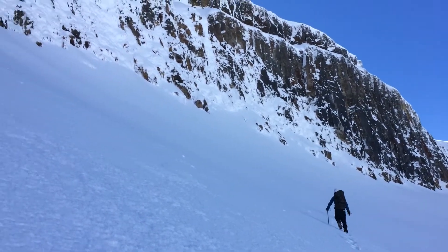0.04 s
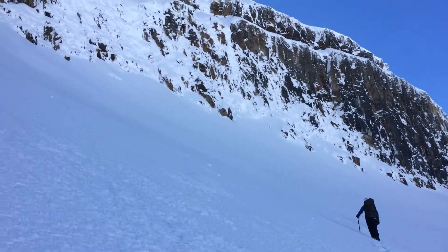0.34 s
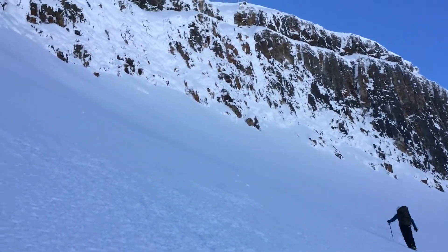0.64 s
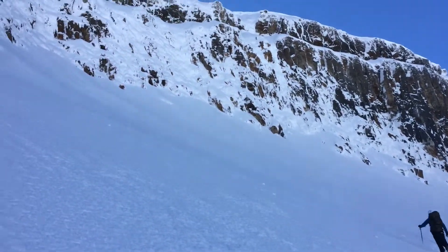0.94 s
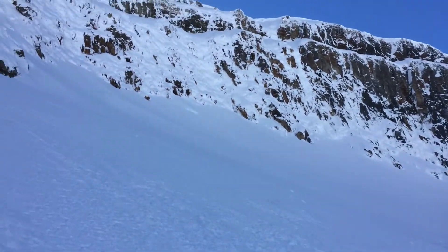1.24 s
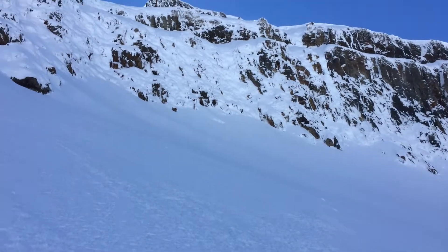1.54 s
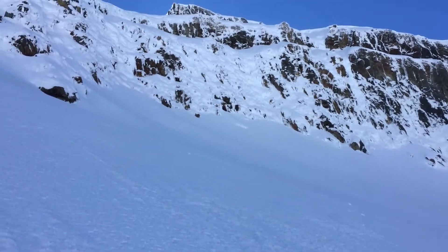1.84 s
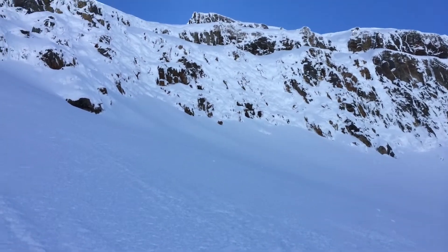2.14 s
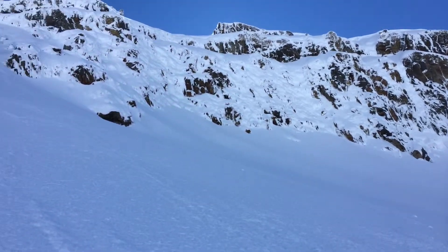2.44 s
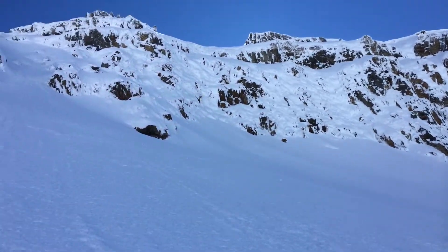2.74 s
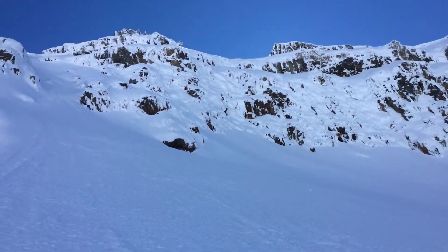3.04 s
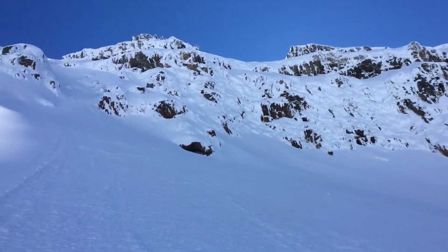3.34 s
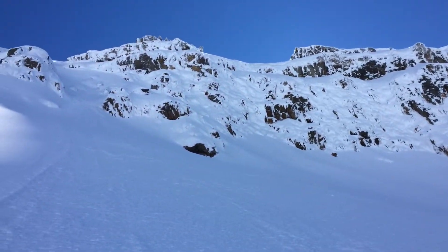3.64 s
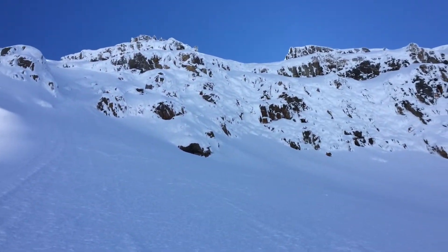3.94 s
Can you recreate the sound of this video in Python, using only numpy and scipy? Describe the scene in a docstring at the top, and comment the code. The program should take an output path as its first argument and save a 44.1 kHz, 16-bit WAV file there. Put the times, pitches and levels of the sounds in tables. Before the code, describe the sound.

A constant, static-like hiss of sliding snow grains, with tiny ticks on a mountainside.

```python
"""A bright, steady hiss: fine snow grains slide down a mountain slope in countless tiny impacts.
Far grains merge into a wash, nearer ones tick, larger icy crumbs ping faintly.
Under it, light air rumbles at the microphone and a hand panning the camera makes a few soft bumps.
The sound is mono."""
import sys
import numpy as np
from scipy import signal
from scipy.fft import rfft, irfft
from scipy.io import wavfile
from scipy.ndimage import uniform_filter1d

SR = 44100
rng = np.random.default_rng(int(sys.argv[2]) if len(sys.argv) > 2 else 0)


def unload_wav(signal):
    """Save mono or channel-first audio to the path in sys.argv[1] as 16-bit WAV at rate SR, clipped to [-1, 1]."""
    wavfile.write(
        sys.argv[1],
        SR,
        np.round(np.clip(np.atleast_2d(signal).T, -1, 1) * 32767).astype(np.int16),
    )


N = 176400
BAND_LIMIT_HZ = 15300


def gain_of(db):
    """Decibels to gain."""
    return 10 ** (np.asarray(db) / 20)


def unit_rms(x):
    """x scaled to rms 1."""
    return x / np.sqrt(np.mean(x ** 2) + 1e-20)


def gain_curve(points):
    """Gain per sample from (time_s, level_db) rows, linear in dB."""
    return gain_of(np.interp(np.arange(N) / SR, *np.transpose(points)))


def coloured(x, spectrum):
    """x filtered by (freq_hz, level_db) rows, band-limited, at rms 1."""
    freq_hz, level_db = np.transpose(spectrum)
    bin_hz = np.fft.rfftfreq(N, 1 / SR)
    response = gain_of(np.interp(np.log(bin_hz + 1), np.log(freq_hz), level_db))
    in_band = bin_hz < BAND_LIMIT_HZ + 200
    return unit_rms(irfft(rfft(x) * response * in_band, N))


def highpass(x, edge_hz):
    """The part of x above a soft edge."""
    ratio = (np.fft.rfftfreq(N, 1 / SR) / edge_hz) ** 4
    return irfft(rfft(x) * ratio / (1 + ratio), N)


def patchy_noise(patch_s, patch_hz, patch_db, flicker_db, size=256):
    """White noise whose level drifts in time-frequency patches and flickers as a whole."""
    hop = size // 4
    spectra = signal.stft(rng.standard_normal(N), nperseg=size, noverlap=size - hop)[2].T
    frames = max(1, round(patch_s * SR / hop))
    bins = max(1, round(patch_hz * size / SR))
    drift = uniform_filter1d(rng.standard_normal(spectra.shape), frames, axis=0)
    patches = unit_rms(uniform_filter1d(drift, bins, axis=1))
    flicker = unit_rms(uniform_filter1d(rng.standard_normal(len(spectra)), max(1, frames // 2)))
    spectra *= gain_of(patch_db * patches + flicker_db * flicker[:, None])
    return signal.istft(spectra.T, nperseg=size, noverlap=size - hop)[1][:N]


def air_rumble():
    """Light air at the microphone: a faint, lumpy rumble."""
    # freq_hz, density_db
    spectrum = [(15, -38), (30, -14), (45, -5), (58, 0.5), (90, -2), (130, -0.5), (185, 2.5), (245, -4),
                (340, -2.5), (450, -9), (800, -28), (3000, -48)]
    # time_s, level_db
    levels = [(0, -71.5), (.8, -69), (1.3, -69), (1.85, -72), (2.25, -67.5), (2.65, -71.5), (2.87, -65.5),
              (3.07, -70.5), (3.4, -69.5), (4, -70)]
    noise = patchy_noise(patch_s=0.046, patch_hz=300, patch_db=1.8, flicker_db=0.8)
    return gain_curve(levels) * coloured(noise, spectrum)


def hand_bumps():
    """A hand pushes and pulls on the camera body: dull pulses of a few cycles at most."""
    # centre_s, envelope_peak_db, pitch_hz, half_width_s
    bumps = [(0.043, -62.5, 60, 0.023), (.425, -63, 85, 0.011), (1.246, -64, 160, .007),
             (1.313, -47, 244, 0.0015), (1.697, -61.5, 190, 0.0068), (2.86, -79, 100, 0.009),
             (3.191, -47, 250, 0.0011), (3.415, -60, 75, .012)]
    out = np.zeros(N)
    for centre_s, peak_db, pitch_hz, half_width_s in bumps:
        t = np.arange(N) / SR - centre_s
        envelope = gain_of(peak_db) * np.exp(-(t / half_width_s) ** 2)
        out += envelope * np.sin(2 * np.pi * pitch_hz * t)
    return out


def icy_crumbs(rate_per_s=300, spread_db=3, level_db=-64.5, decay_cycles=8, pitches=30):
    """Larger icy crumbs tumble along, each impact a brief, faint ping."""
    t = np.arange(2000) / SR
    out = np.zeros(N)
    for pitch_hz in np.geomspace(1695, 2597, pitches):
        ping = np.sin(2 * np.pi * pitch_hz * t) * np.exp(-t * pitch_hz / decay_cycles)
        hits = rng.random(N) < rate_per_s / pitches / SR
        strengths = gain_of(spread_db * np.minimum(rng.exponential(1, N), 4))
        out += signal.oaconvolve(hits * strengths, ping)[:N]
    return gain_of(level_db) * unit_rms(out)


def sliding_snow(grains_per_s=3500, spread_db=2.5, grains_re_wash_db=-7):
    """Far grains merge into a wash, nearer ones tick singly; both follow the flow."""
    # freq_hz, density_db
    spectrum = [(150, -26.5), (500, -19), (700, -12.5), (950, -8), (1300, -5), (1800, -2.5), (2350, -1.6),
                (2750, -3), (4200, -1.5), (7000, 0.05), (8600, -0.3), (12000, 0.26), (15000, 1)]
    # amount of moving snow: time_s, level_db
    flow = [(0, -44.5), (.3, -44), (.7, -44), (1.5, -44), (2.3, -44), (3.1, -44), (3.6, -43.5), (4, -44)]
    # time_s, boost_db
    treble_shelf = [(0, -0.62), (0.7, 0.33), (2, 0.25), (4, -0.4)]
    noise = patchy_noise(patch_s=0.044, patch_hz=900, patch_db=0.64, flicker_db=0.23)
    wash = coloured(noise, spectrum)
    strengths = gain_of(spread_db * np.minimum(rng.exponential(1, N), 5))
    signs = rng.choice([-1, 1], N)
    hits = rng.random(N) < grains_per_s / SR
    grains = coloured(strengths * signs * hits, spectrum)
    hiss = unit_rms(wash + gain_of(grains_re_wash_db) * grains)
    treble_change = (gain_curve(treble_shelf) - 1) * highpass(hiss, edge_hz=5000)
    return gain_curve(flow) * (hiss + treble_change)


def scene():
    """Snow hiss and crumbs over rumble and bumps, the same in both channels."""
    mono = sliding_snow() + icy_crumbs() + air_rumble() + hand_bumps()
    return np.array([mono, mono])


def record(dry):
    """Steep low-pass at the band limit."""
    taps = signal.firwin(1023, BAND_LIMIT_HZ, window=("kaiser", 9), fs=SR)
    return signal.oaconvolve(dry, taps[None], "same")


dry = scene()
out = record(dry)
unload_wav(out)
```